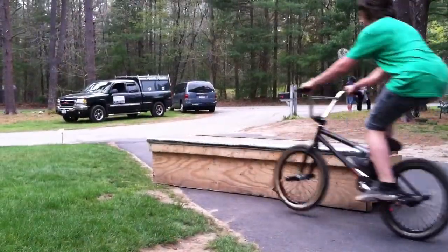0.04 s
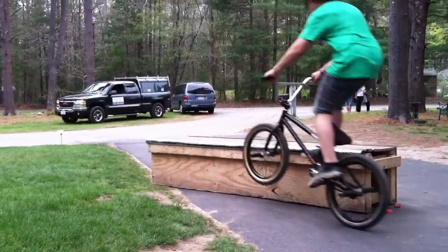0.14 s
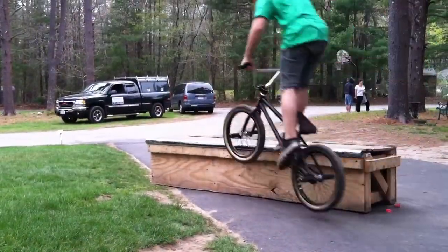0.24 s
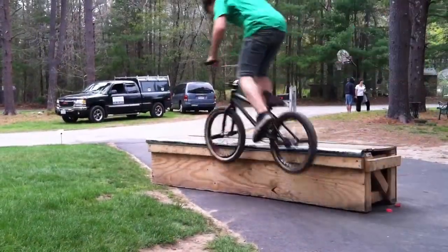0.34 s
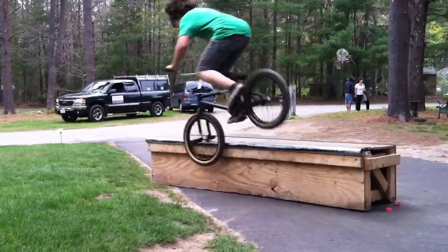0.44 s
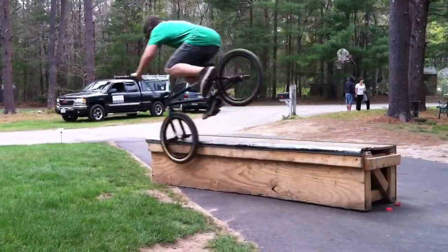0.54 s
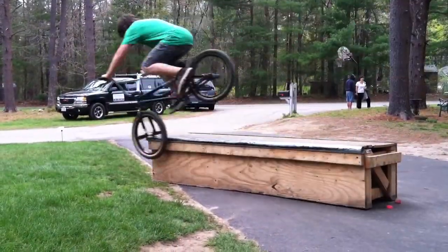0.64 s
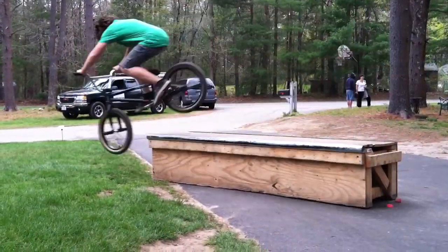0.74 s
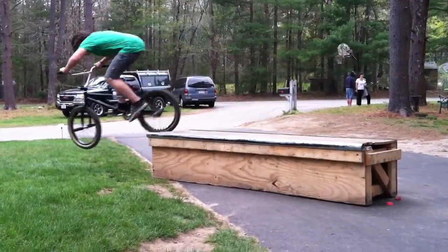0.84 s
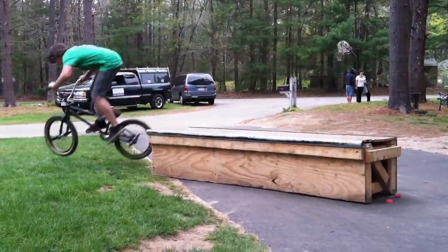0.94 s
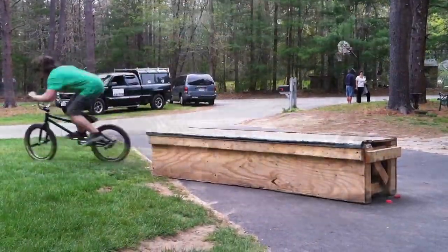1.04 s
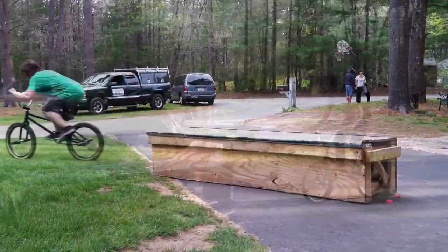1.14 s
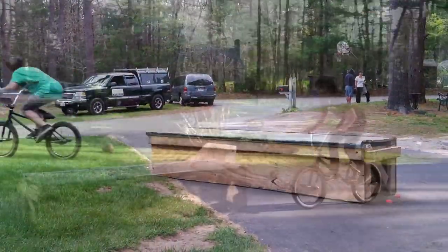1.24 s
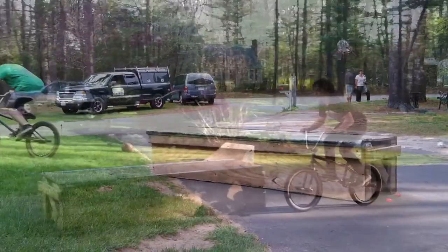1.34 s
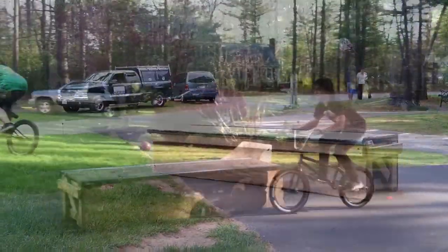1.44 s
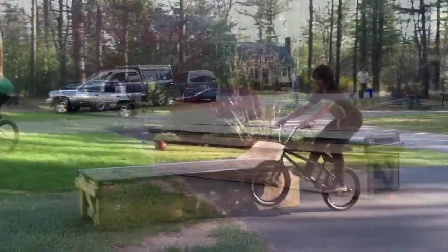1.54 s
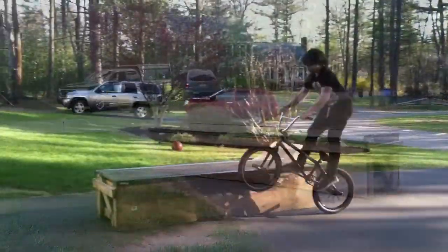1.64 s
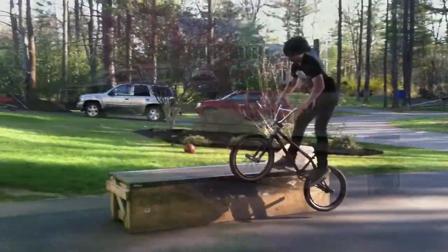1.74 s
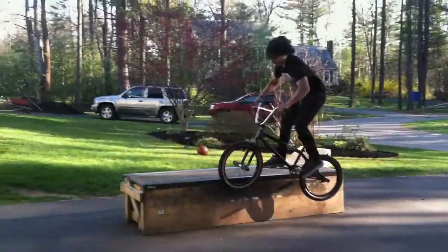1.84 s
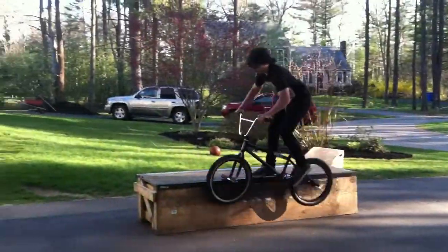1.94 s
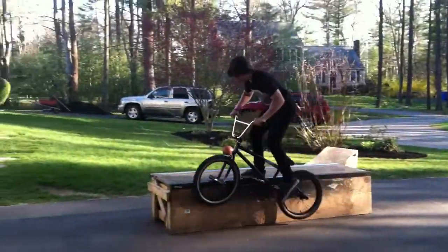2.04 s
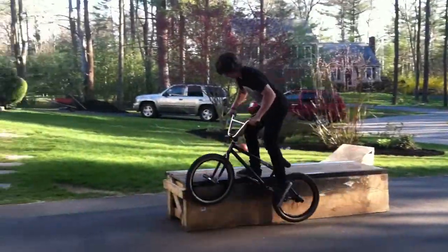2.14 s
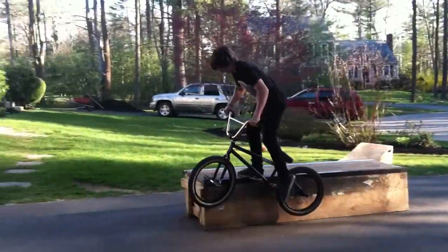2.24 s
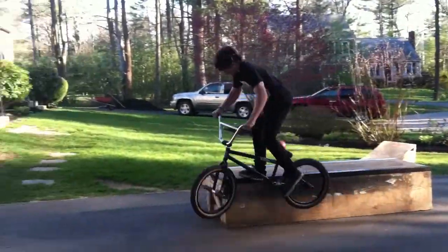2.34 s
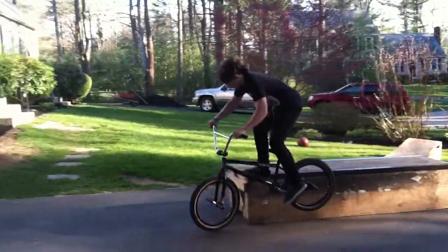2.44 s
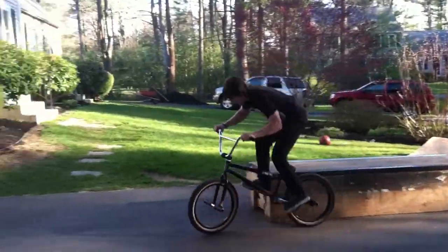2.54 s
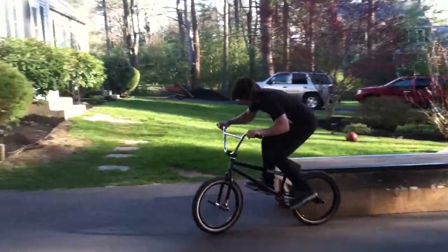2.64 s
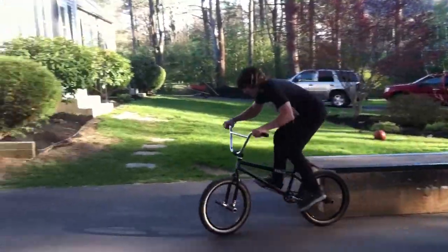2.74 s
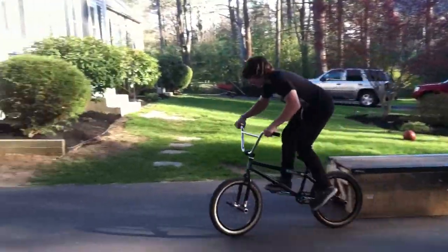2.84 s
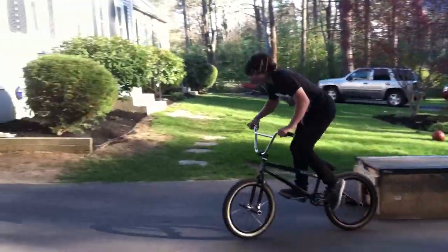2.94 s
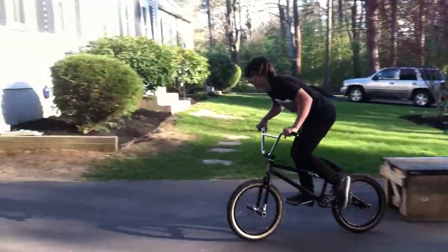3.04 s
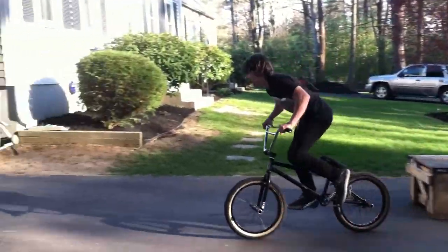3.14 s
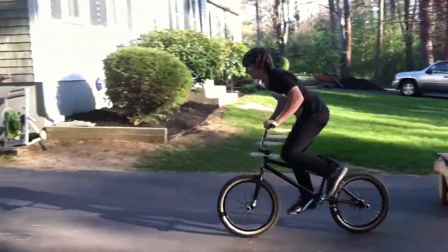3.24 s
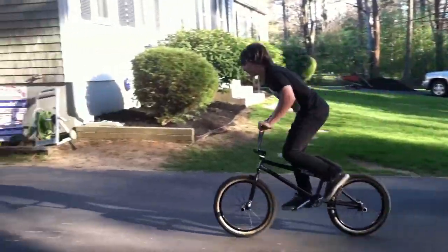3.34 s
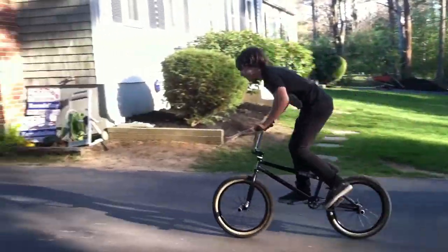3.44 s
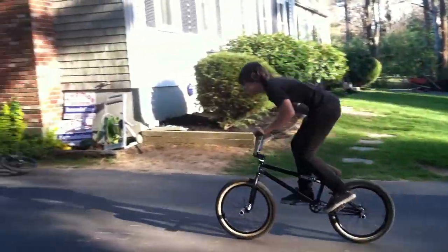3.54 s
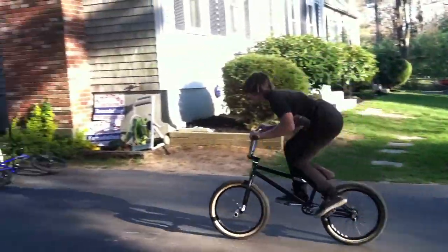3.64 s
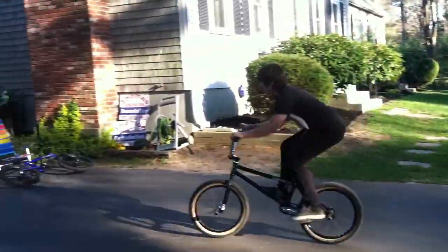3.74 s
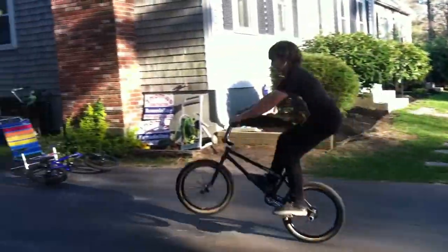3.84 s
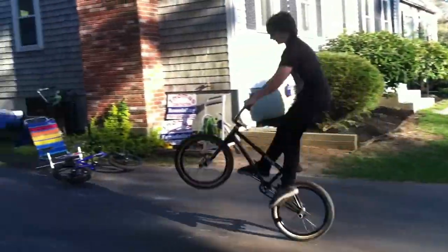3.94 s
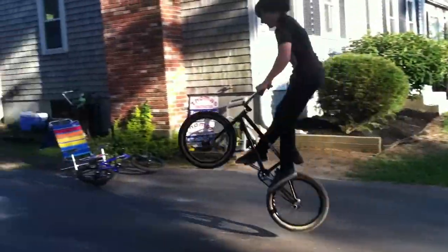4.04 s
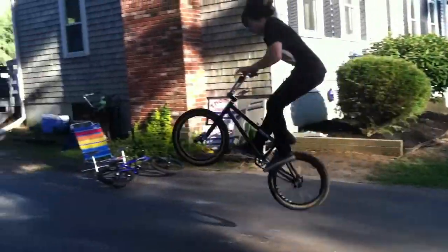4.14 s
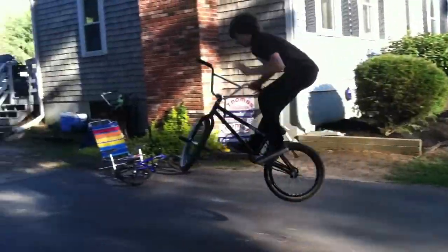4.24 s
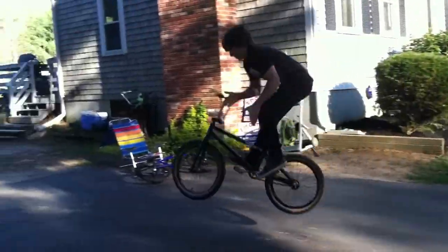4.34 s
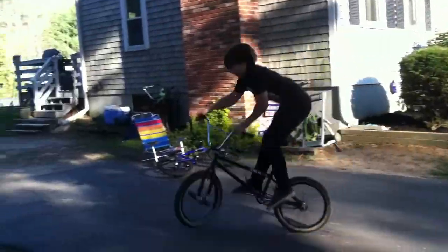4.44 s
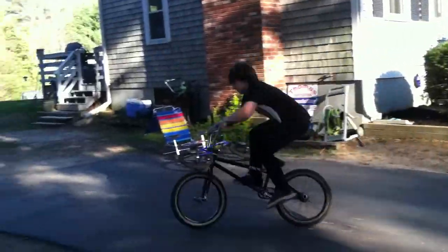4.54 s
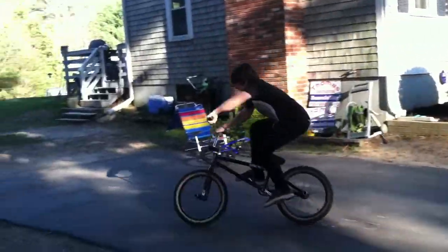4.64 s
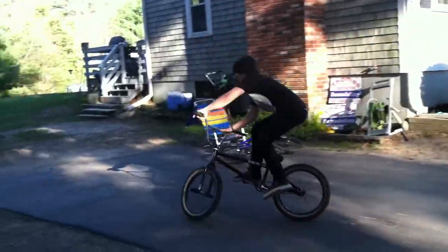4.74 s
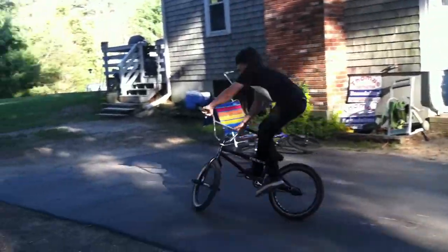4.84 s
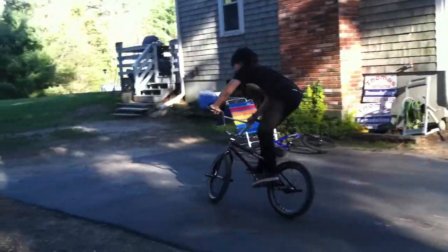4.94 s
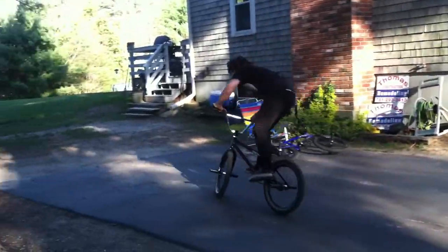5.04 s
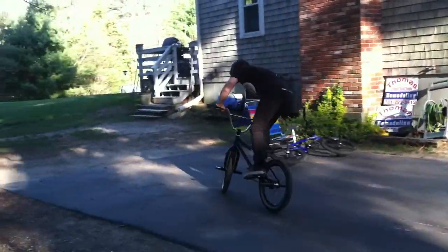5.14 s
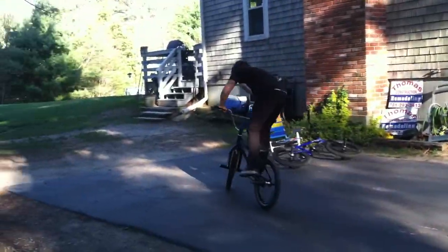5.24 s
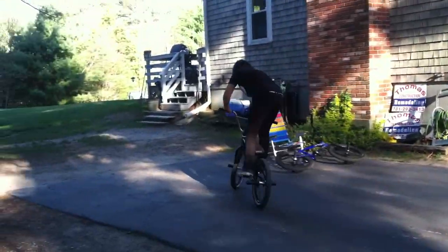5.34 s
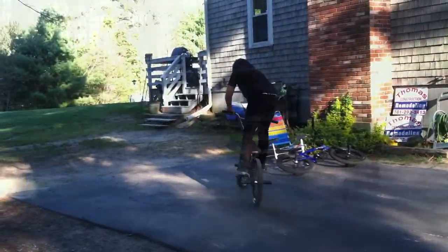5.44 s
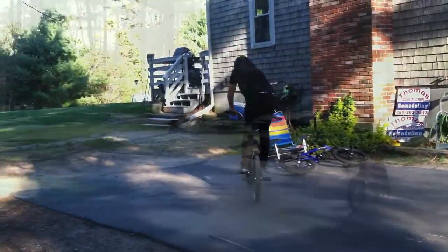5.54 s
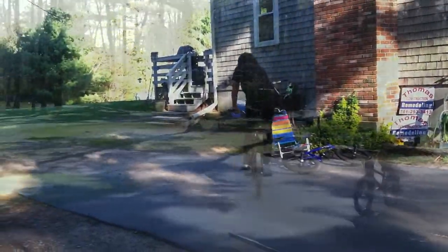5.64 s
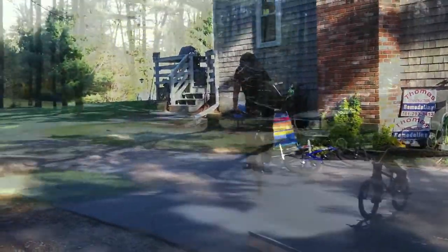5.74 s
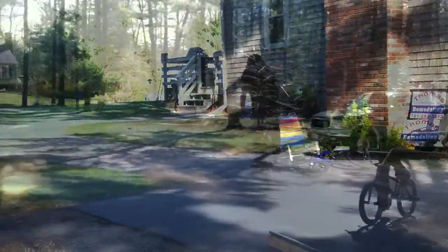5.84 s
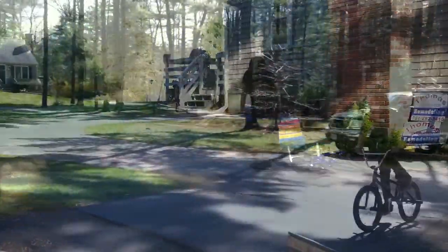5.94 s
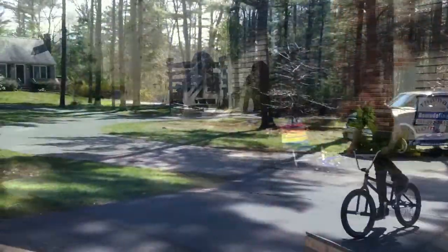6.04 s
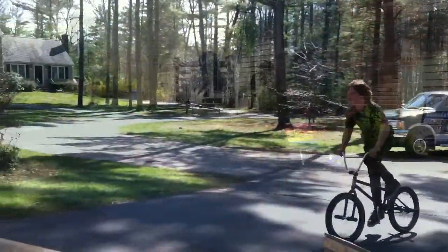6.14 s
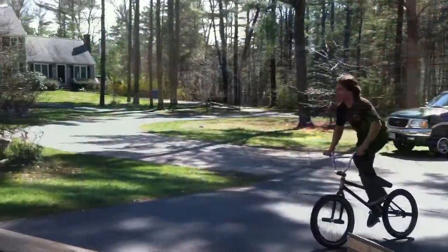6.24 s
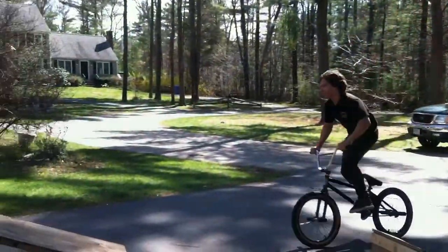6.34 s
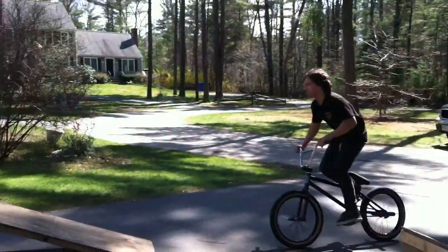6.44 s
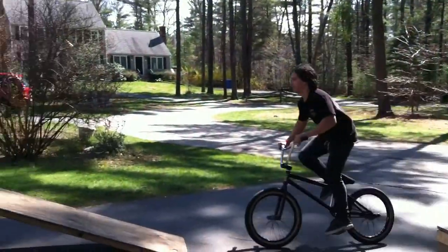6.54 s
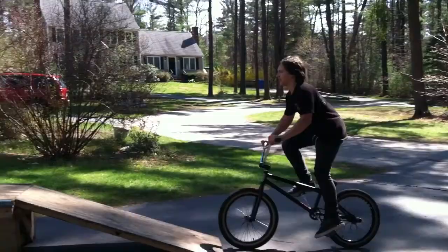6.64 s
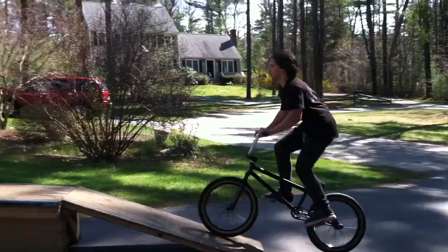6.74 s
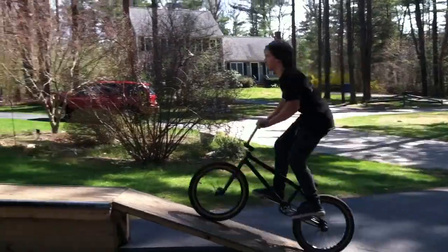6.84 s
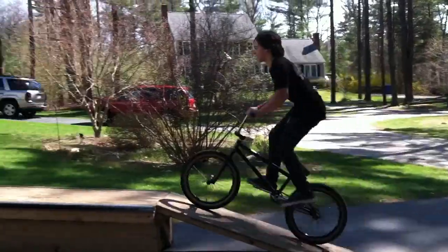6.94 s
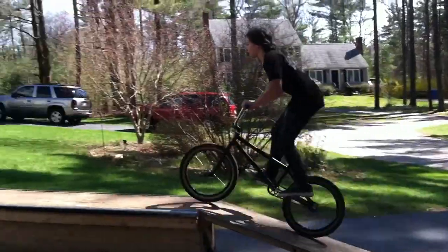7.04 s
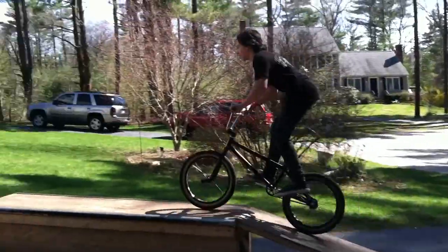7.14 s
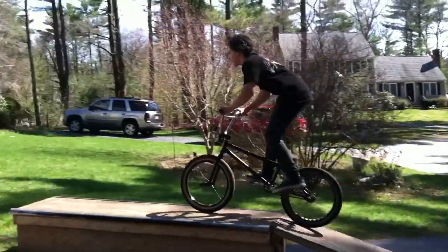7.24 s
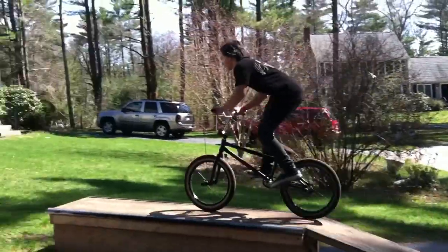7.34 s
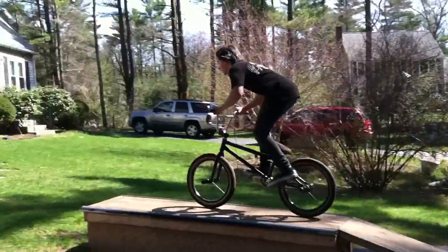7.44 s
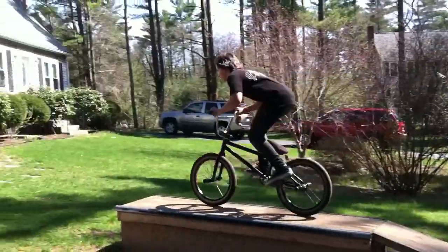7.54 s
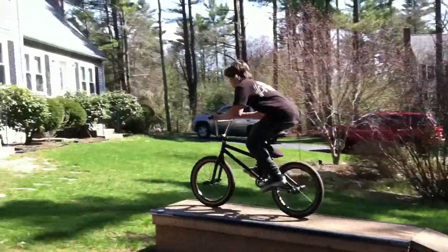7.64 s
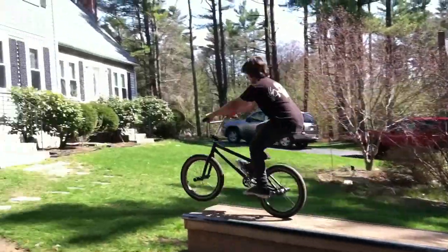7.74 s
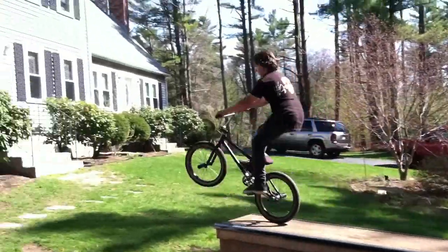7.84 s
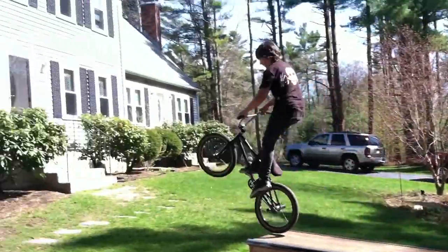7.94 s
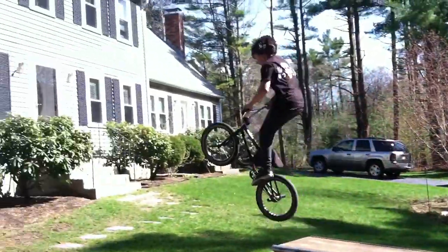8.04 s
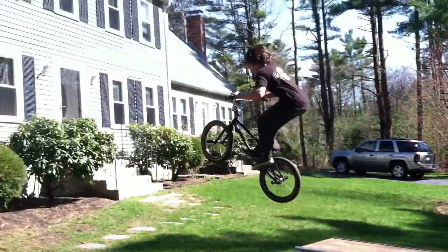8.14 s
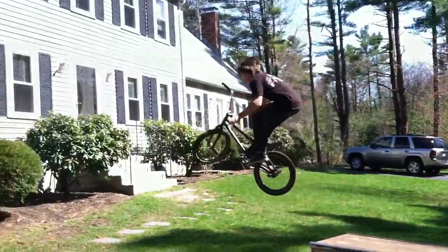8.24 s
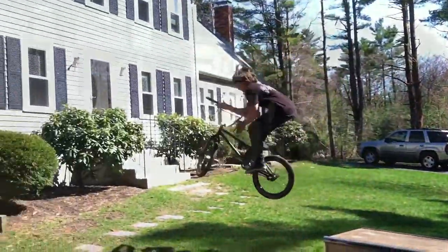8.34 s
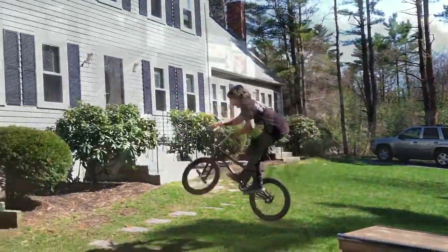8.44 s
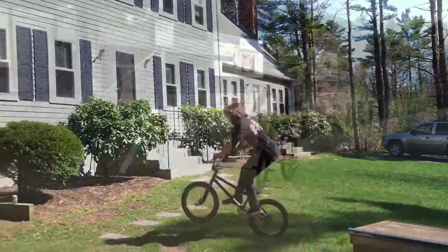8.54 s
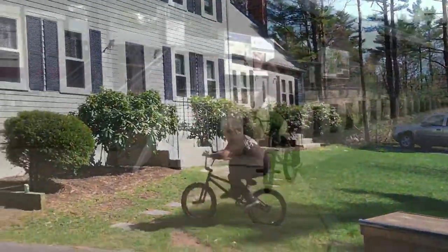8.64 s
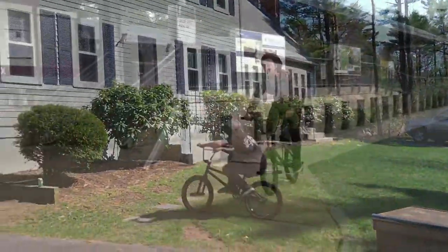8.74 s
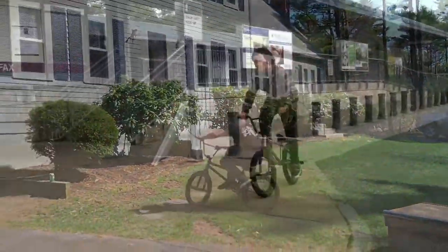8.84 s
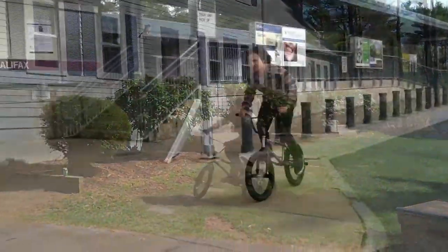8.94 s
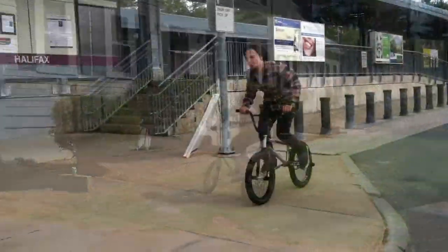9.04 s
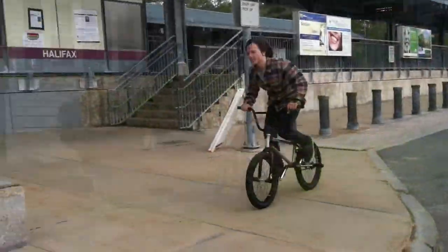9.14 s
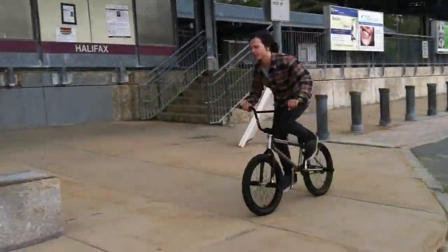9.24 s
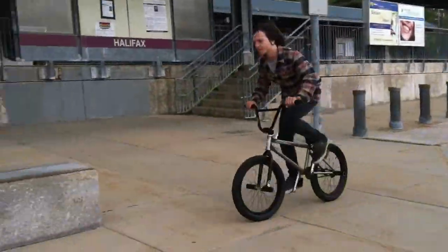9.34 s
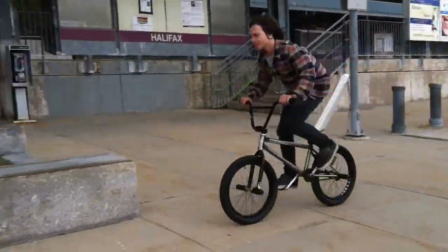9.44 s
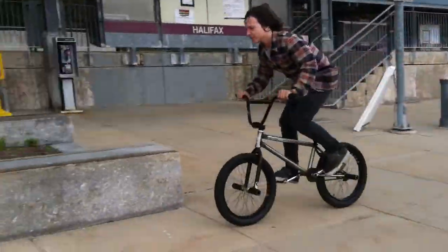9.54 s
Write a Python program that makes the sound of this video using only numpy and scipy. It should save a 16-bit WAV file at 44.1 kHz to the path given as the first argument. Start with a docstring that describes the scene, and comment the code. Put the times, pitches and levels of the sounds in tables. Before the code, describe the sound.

Close bike sounds with a faint dull yard echo: buzzing hub clicks, then two loud hollow wood impacts about a second and a half apart, each followed by short droning grinds and steel clinks. Quieter coasting follows, with distant bird whistles, a tyre slap on asphalt, two knocks onto a wooden ramp with faster ticking, a soft thud on grass, and a sudden low, crackling wind burst at the end.

```python
"""BMX runs on a driveway: the rear hub rattles in ticks whenever the rider coasts, from the start on.
Pegs slam onto a tall hollow plywood ledge, then a low one, and grind: boom, crack, scrape, drone and squeals.
A bird whistles faintly; tyres land on asphalt and scuff, then bump up a wooden ramp as a far motor swells.
They drop onto grass, and at the end wind builds up and buffets the microphone.
Noise is filtered for rattles, cracks, scrapes and wind; damped modes boom and ring; sines drone and whistle."""
import sys
import numpy as np
from scipy import signal
from scipy.fft import rfft, irfft
from scipy.io import wavfile
from scipy.ndimage import uniform_filter1d

SR = 44100
rng = np.random.default_rng(int(sys.argv[2]) if len(sys.argv) > 2 else 0)


def to_wav(sig):
    """Store sig (one row per channel, or 1-D mono) as 16-bit WAV at the path in sys.argv[1].

    Samples outside -1..1 are clipped; the rate is SR.
    """
    pcm = np.clip(np.atleast_2d(sig), -1, 1) * 32767
    pcm = np.round(pcm).astype(np.int16)
    wavfile.write(sys.argv[1], SR, pcm.T)  # frames by channels


N = 422575
TIME = np.arange(N) / SR


def undb(db):
    """Decibels to amplitude gain."""
    return 10 ** (np.asarray(db) / 20)


def sine(phase_turns):
    """Sine of a phase counted in turns."""
    return np.sin(2 * np.pi * phase_turns)


def noise():
    """White noise of unit power."""
    return rng.standard_normal(N)


def walk(rate_hz):
    """Smooth random drift with unit spread, about rate_hz new values per second."""
    hold = max(int(SR / rate_hz), 1)
    steps = np.repeat(rng.standard_normal(N // hold + 1), hold)
    drift = uniform_filter1d(steps, hold)[:N]
    return drift / drift.std()


def swell(rows):
    """Gain along (time_s, level_db) rows, silent outside them."""
    time_s, level_db = np.transpose(rows)
    inside = (TIME >= time_s[0]) & (TIME <= time_s[-1])
    return undb(np.interp(TIME, time_s, level_db)) * inside


def bell(at_s, sigma_s):
    """Gaussian rise and fall around one moment."""
    return np.exp(-.5 * ((TIME - at_s) / sigma_s) ** 2)


def fade(t, t60_s):
    """Exponential decay, 60 dB down after t60_s."""
    return np.exp(-np.log(1000) * t / t60_s)


def held(start_s, end_s, attack_s, t60_s, db_per_s):
    """Attack up to the start, a hold that slopes in dB, and a release after the end."""
    rise = np.clip(1 + (TIME - start_s) / attack_s, 0, 1)
    slope = undb(db_per_s * (np.clip(TIME, start_s, end_s) - start_s))
    return rise * slope * fade(np.maximum(TIME - end_s, 0), t60_s)


def bursts(rows):
    """Envelope of sudden bursts from (time_s, level_db, t60_s) rows; their powers add."""
    power = np.zeros(N)
    for time_s, level_db, t60_s in rows:
        part = power[int(time_s * SR):][:SR // 2]
        part += (undb(level_db) * fade(TIME[:len(part)], t60_s)) ** 2
    return np.sqrt(power)


def impulses(times_s, sizes):
    """One single-sample push at each time."""
    return np.bincount((np.asarray(times_s) * SR).astype(int), sizes, N)[:N]


def ring(x, response):
    """Pass a sound through an impulse response."""
    return signal.fftconvolve(x, response)[:N]


def unit(response):
    """Scale a response to unit energy."""
    return response / np.linalg.norm(response)


def modal(modes):
    """Half-second response of damped modes; their gains are scaled to unit total power."""
    t = TIME[:SR // 2]
    total = sum(undb(db) * fade(t, t60_s) * np.cos(2 * np.pi * hz * t) for hz, db, t60_s in modes)
    return total / np.linalg.norm(undb([db for _, db, _ in modes]))


def tint(x, points, size=4096):
    """Causal minimum-phase unit-energy filter through (freq_hz, relative_db), falling off outside."""
    hz, db = np.transpose(points)
    octave = np.log2(np.maximum(np.arange(size // 2 + 1), 1) * SR / size)
    knots = np.log2(hz)
    outside = np.abs(octave - np.clip(octave, knots[0], knots[-1]))
    curve_db = np.interp(octave, knots, db) - 18.0 * np.minimum(outside, 2)  # dB per octave, 2 octaves
    cepstrum = irfft(np.log(undb(curve_db)))
    # folding the cepstrum gives minimum phase
    cepstrum[1:size // 2] *= 2
    cepstrum[size // 2 + 1:] = 0
    return ring(x, unit(irfft(np.exp(rfft(cepstrum)))))


def soften(x, contact_hz, low_hz=85):
    """The contact cushions a push above contact_hz; the deepest bass hardly radiates."""
    cushioned = signal.sosfilt(signal.butter(4, min(contact_hz, SR / 3), fs=SR, output="sos"), x)
    return signal.sosfilt(signal.butter(2, low_hz, "highpass", fs=SR, output="sos"), cushioned)


# still air among the trees: freq_hz, relative_db
AIR_COLOUR = [(40, -42.5), (70, -14.5), (115, 1.5), (200, -0.5), (380, -9), (760, -3.5), (1600, -7),
              (2400, -13.5), (4000, -16.5), (6000, -21), (9000, -19), (12000, -29.5), (15500, -41)]
# its level: time_s, level_db
AIR_LEVEL = [(0, -50), (1.2, -57.5), (1.8, -56.5), (3.2, -58), (4.8, -54), (5.8, -58), (6.4, -56),
             (8.2, -62), (9.58, -53.5)]


def air():
    """Soft air in the trees: filtered noise with a slight flutter."""
    return tint(noise() * swell(AIR_LEVEL) * undb(0.79 * walk(18)), AIR_COLOUR)


# distant motor tones: freq_hz, relative_db
MOTOR_LINES = [(126, 3), (250, 1.5), (376, -9)]
# its swell: loudest_s, sigma_s, level_db
MOTOR_SWELL = (6.97, 0.78, -57)


def motor():
    """Hum of three sines that share one wavering clock and level."""
    clock_s = np.cumsum(1 + 0.0062 * walk(13)) / SR
    loudest_s, sigma_s, level_db = MOTOR_SWELL
    level = bell(loudest_s, sigma_s) * undb(level_db + 4.7 * walk(8))
    return level * sum(undb(db) * sine(hz * clock_s) for hz, db in MOTOR_LINES)


# distant bird whistles: start_s, length_s, start_hz, end_hz, level_db
WHISTLES = [(2.85, .32, 2750, 2270, -63), (4.2, .18, 2120, 2330, -60), (4.88, .2, 2170, 2380, -61),
            (5.56, .14, 3400, 3000, -63), (5.65, .26, 2650, 2370, -62)]


def bird():
    """Far whistles: sines that slide fast, then ease into the end pitch, wavering."""
    out, waver = np.zeros(N), 1 + 0.019 * walk(300)
    for start_s, length_s, start_hz, end_hz, level_db in WHISTLES:
        progress = np.clip((TIME - start_s) / length_s, 0, 1)
        pitch_hz = (end_hz + (start_hz - end_hz) * (1 - progress) ** 2) * waver
        envelope = np.sqrt(np.abs(np.sin(np.pi * progress)))
        out += undb(level_db) * envelope * sine(np.cumsum(pitch_hz) / SR)
    return out


# wind gusts: peak_s, peak_db (before steady_db), rise_db_per_s, fall_db_per_s
GUSTS = [(8.62, -30, 160, 55), (9.313, -9.4, 48, 61)]
# buffets, each with a pop on the microphone port: time_s, buffet_db, pop_db (before EDDY_COLOUR)
BUFFETS = [(9.068, -19, -3.5), (9.105, -12.5, -6), (9.184, -18.5, -4), (9.217, -12.5, 1), (9.25, -16, 1.5),
           (9.298, -11.5, 10.5), (9.304, -6.5, 11.5), (9.327, -8, 4), (9.354, -10.5, 5.5), (9.421, -8, -11)]
BUFFET_SIGMA_S = 0.0081
# turbulence; small eddies and pops: freq_hz, relative_db
WIND_COLOUR = [(25, -43), (60, -27), (110, -7.5), (170, -0.5), (270, -5), (400, -12), (650, -25.5),
               (1200, -63), (2500, -73)]
EDDY_COLOUR = [(200, -18), (450, 8), (900, -2.5), (1600, -17.5), (3000, -40.5), (5000, -49)]


def wind(steady_db=-3.0, flutter_db=2.0, eddy_db=-1.5, eddy_growth=1.564):
    """Turbulence thumps on the microphone; bright eddies grow faster than the force;
    each buffet adds a sharp pop of its own level."""
    gusts = [undb(db + np.minimum(rise * (TIME - peak_s), fall * (peak_s - TIME)))
             for peak_s, db, rise, fall in GUSTS]
    force = np.linalg.norm(gusts, axis=0) * undb(steady_db + flutter_db * walk(60))
    for time_s, buffet_db, _ in BUFFETS:
        force = np.hypot(force, undb(buffet_db) * bell(time_s, BUFFET_SIGMA_S))
    eddies = noise() * force ** eddy_growth * undb(eddy_db + 5.0 * (walk(300) - 2))
    times_s, _, pop_db = np.transpose(BUFFETS)
    pops = impulses(times_s, undb(pop_db))
    return tint(noise() * force, WIND_COLOUR) + tint(eddies - pops, EDDY_COLOUR)


def yard(x, echo_db=-23, t60_s=1.0, delay_s=0.046, dull_hz=3500):
    """House front and trees scatter a faint, dull echo."""
    t = TIME[:SR]
    response = rng.standard_normal(SR) * fade(t, t60_s) * (t > delay_s)
    dull = signal.sosfilt(signal.butter(1, dull_hz / (SR / 2), output="sos"), x)
    return x + undb(echo_db) * ring(dull, unit(response))


# tyre passes: nearest_s, sigma_s, level_db
ROLLS = [(.3, .7, -53.5), (3.6, 0.6, -62.5), (4.781, 0.19, -60.5), (6.66, 0.11, -47), (7.102, 0.22, -44),
         (7.796, 0.31, -48), (8.612, 0.33, -50)]
# tyres on asphalt and planks: freq_hz, relative_db
ROLL_COLOUR = [(50, -36), (110, -2), (200, -1.5), (270, -5.5), (400, -14.5), (800, -17), (2000, -29),
               (4000, -20.5)]


def tyres():
    """Tyres roll past on asphalt and planks: filtered noise, uneven in level."""
    power = sum((undb(db) * bell(nearest_s, sigma_s)) ** 2 for nearest_s, sigma_s, db in ROLLS)
    return tint(noise() * np.sqrt(power) * undb(1.7 * walk(30)), ROLL_COLOUR)


# steel bike parts clicking together: time_s, level_db, t60_s
CLINKS = [(.513, -31, .044), (1.107, -41.5, 0.096), (2.062, -25.5, 0.015), (2.0765, -20, 0.056),
          (2.6425, -29, .03), (2.672, -40, 0.075), (2.964, -50.5, .05), (3.136, -50, 0.013),
          (4.568, -23.5, 0.01), (4.589, -34, .04), (5.049, -43, .078), (5.933, -41.5, 0.014),
          (6.401, -40.5, .013), (6.605, -41, 0.0048), (6.873, -32, .012), (7.848, -33.5, .079),
          (8.674, -42.5, .022)]
# steel contact: freq_hz, relative_db
STEEL_COLOUR = [(1200, -10.5), (2200, -7), (4300, -1), (5700, -11.5), (7000, -7), (9000, 0), (10500, -9),
                (13000, -22), (15500, -45)]


def clinks():
    """Loose steel parts click: short bright noise bursts."""
    return tint(noise() * bursts(CLINKS), STEEL_COLOUR)


# frame, pegs and spokes ringing after a blow: freq_hz, relative_db, undamped_t60_s
FRAME_MODES = [(803, -4.5, 0.3), (1182, -6, .15), (1340, -4, .2), (1456, -0.5, .25), (1600, -2.5, 0.23),
               (1935, -6.5, .5), (2152, -4, 0.19), (2264, -6, 0.54), (2566, -1, 0.089), (2900, -9, .4),
               (3080, -3.5, 0.31), (3510, -3.5, .3), (4381, -9.5, .15), (6240, -4, .2), (8772, -5, .12),
               (9151, -7.5, .12)]


def frame(x, ring_db):
    """Whatever shakes the bike also sets its steel tubes ringing."""
    return x + undb(ring_db) * ring(x, unit(modal(FRAME_MODES)))


# chain and pegs slapping the frame: time_s, level_db
FRAME_SLAPS = [(.514, -31), (0.564, -44), (.65, -39), (2.063, -15), (2.15, -45), (2.19, -37), (2.39, -51),
               (2.6425, -37), (2.964, -40), (5.049, -38.5), (6.352, -41), (8.656, -50), (8.6744, -31),
               (8.712, -39)]


def clatter(damping=0.13, tick_db=-14, tick_t60_s=.03):
    """Chain and pegs slap the frame; the rider's grip cuts the ring of the tubes short."""
    out = np.zeros(N)
    for time_s, level_db in FRAME_SLAPS:
        # each slap lands somewhere else, so the modes share it differently
        chance = rng.standard_normal((len(FRAME_MODES), 2))
        modes = [(hz * (1 + 0.0072 * detune), db + 3 * share, t60_s * damping)
                 for (hz, db, t60_s), (detune, share) in zip(FRAME_MODES, chance)]
        part = out[int(time_s * SR):][:SR // 2]
        part += undb(level_db) * modal(modes)[:len(part)]
    ticks = bursts((time_s, db + tick_db, tick_t60_s) for time_s, db in FRAME_SLAPS)
    return soften(out, 9200) + tint(noise() * ticks, STEEL_COLOUR)


def rub(pressure, colour, rough_db):
    """A sliding contact catches and slips in uneven jolts."""
    jolts = undb(rough_db * (walk(260) - 2) + 1.5 * walk(40))
    return tint(noise() * jolts * pressure, colour)


# tyres scuffing after landing: time_s, pressure_db (before the jolts of rub)
SCUFF_PRESSURE = [(4.62, -60), (4.68, -50), (4.76, -52), (4.86, -54.5), (5.0, -66)]
# freq_hz, relative_db
SCUFF_COLOUR = [(250, -14), (500, 0), (750, -1), (1200, -17), (2500, -14)]


def scuff():
    """The tyres scuff as the bike swerves after landing."""
    return rub(swell(SCUFF_PRESSURE), SCUFF_COLOUR, rough_db=2.0)


# pegs sliding along a ledge: start_s, end_s, scrape_db (before the jolts of rub), scrape_slope_db_per_s,
# drone_db, drone_hz, drone_sag_hz_per_s, surface
GRINDS = [(0.536, 0.752, -39, 22, -23, 167.4, 38, "tall ledge"),
          (2.086, 2.345, -21.5, -73, -22.5, 223.8, 193, "low ledge"),
          (2.378, 2.41, -30.5, -120, -27.5, 207, 12, "low ledge"),
          (2.51, 2.678, -41, 7, -46.5, 200.2, 30, "low ledge")]
GRIND_ATTACK_S, GRIND_RELEASE_T60_S = .015, 0.29  # the peg bites, then lifts off
# ledge scrapes: freq_hz, relative_db
TALL_SCRAPE = [(400, -1), (600, 2.5), (820, -3), (1100, -9.5), (1550, -4.5), (2200, -4), (3000, -3.5),
               (3900, -2.5), (5200, -29), (6500, -14), (7700, -4), (9700, -17), (13000, -42.5)]
LOW_SCRAPE = [(240, -12), (400, 0.5), (446, -25), (594, -1.5), (925, -9), (1340, -7.5), (1790, -13.5),
              (2470, -14), (2990, -19), (3760, -24), (7000, -36), (9100, -59), (15400, -120)]


def sliding(surface):
    """How hard the pegs scrape along one ledge; the powers of its grinds add."""
    power = sum((undb(db) * held(start_s, end_s, GRIND_ATTACK_S, GRIND_RELEASE_T60_S, slope)) ** 2
                for start_s, end_s, db, slope, *_, on in GRINDS if on == surface)
    return np.sqrt(power)


def scrapes():
    """Pegs scrape along both ledges: jolting noise in each ledge's colour."""
    tall = rub(sliding("tall ledge"), TALL_SCRAPE, rough_db=3.6)
    return tall + rub(sliding("low ledge"), LOW_SCRAPE, rough_db=3.0)


DRONE_FADE_DB_PER_S, DRONE_RELEASE_T60_S = 28, 0.22


def drone(wobble=0.054, flutter_db=3):
    """Sliding keeps the plywood droning, lower as the peg moves along: wavering, falling sines."""
    out, waver, flutter = np.zeros(N), 1 + wobble * walk(110), undb(flutter_db * walk(60))
    for start_s, end_s, _, _, level_db, hz, sag_hz_per_s, _ in GRINDS:
        pitch_hz = (hz - sag_hz_per_s * (np.clip(TIME, start_s, end_s) - start_s)) * waver
        envelope = held(start_s, end_s, GRIND_ATTACK_S, DRONE_RELEASE_T60_S, -DRONE_FADE_DB_PER_S)
        out += undb(level_db) * envelope * flutter * sine(np.cumsum(pitch_hz) / SR)
    return out


# a peg binding on the edge: time_s, sigma_s, pitch_hz, level_db
SQUEALS = [(0.67, .025, 2170, -39), (0.703, 0.038, 810, -34), (0.759, 0.018, 1906, -36),
           (0.843, 0.055, 1870, -51), (2.238, 0.0072, 2930, -35), (2.29, .04, 3020, -46.5)]


def squeals(wobble=0.0123):
    """The peg binds and squeals; the grip keeps breaking, so the tone is rough."""
    chatter = walk(170)
    clock_s = np.cumsum(1 + wobble * walk(350)) / SR
    return chatter * sum(undb(db) * bell(time_s, sigma_s) * sine(hz * clock_s)
                         for time_s, sigma_s, hz, db in SQUEALS)


# coasting: start_s, end_s, ticks_per_s (before rocking), tick_db (before gain_db),
# approach_s, retreat_s, hub_colour
COASTS = [(.007, .51, 34.8, -37.5, 0, 0, "first"), (.8, 1.31, 34, -45, 0, .3, "first"),
          (1.321, 1.79, 36.48, -43, 0.41, 0.016, "driveway"), (1.84, 2.91, 34.27, -40, 0, 0.19, "driveway"),
          (3.391, 4.02, 26.73, -39, 0, 0.16, "driveway"),
          (4.077, 4.76, 25.3, -38.5, 0.17, 0.054, "driveway"), (4.897, 4.99, 35, -35.5, 0, 0.2, "driveway"),
          (5.144, 5.94, 29.9, -40.5, 0.02, 0.56, "driveway"), (5.992, 6.3, 32.27, -43.5, 0.19, 0, "far"),
          (6.899, 8.064, 44.5, -34, 0.11, 0.18, "ramp"), (8.099, 9.034, 46.3, -37, 0.021, 0.66, "ramp"),
          (9.394, 9.58, 47.95, -40.5, 0.038, 0, "last")]
# cranks rocked backwards (+) or forwards (-): time_s, sigma_s, extra_ticks_per_s
CRANK_ROCKS = [(0.082, 0.0706, 79.7), (0.455, 0.083, 10), (0.85, 0.03, 37.5), (1.001, 0.112, 15.5),
               (1.257, 0.044, 53), (1.417, 0.067, 16.9), (1.57, 0.05, 72), (2.122, 0.04, 52.5),
               (2.324, 0.036, -5.0), (2.548, 0.05, 62.1), (2.831, 0.019, 20.5), (3.523, 0.079, 55.5),
               (3.866, 0.078, 85.0), (4.154, 0.033, 12.5), (4.562, 0.13, 37.5), (4.689, 0.036, 39.5),
               (5.393, 0.0483, 10.5), (6.105, 0.078, 53.9), (7.019, 0.099, 21.5), (7.554, 0.042, 5),
               (7.826, 0.032, 71), (8.038, 0.054, -18.5), (8.389, 0.059, 44), (8.891, 0.0561, 55),
               (9.498, 0.0586, 83.5)]
# hub colours: freq_hz, relative_db
HUB_FIRST = [(1500, -5), (2200, -5.5), (3000, 2), (4200, -0.5), (5400, -43.5), (6600, -7), (8500, -2),
             (11000, -8), (13000, -17.5), (15500, -46)]
HUB_DRIVEWAY = [(1900, -12.5), (2600, -8.5), (3150, -1.5), (3900, -6.5), (4900, -4.5), (5700, -14),
                (6500, -4), (7500, -11), (8900, -1.5), (10500, -4), (12400, -6), (13400, -24.5),
                (15500, -29.5)]
HUB_FAR = [(2000, -31.5), (2800, -20), (3200, 0), (3900, 3), (5400, -13.5), (7000, -2), (8500, -20),
           (11000, -11.5), (13500, -31), (15500, -27)]
HUB_RAMP = [(2200, -18), (2750, -23.5), (3100, -9), (3600, 0.5), (4450, 0), (5400, -14), (6700, -4.5),
            (7800, -10), (9200, -16), (10800, -12), (12500, -19.5), (14000, -24), (15500, -37)]
HUB_LAST = [(1530, -11), (2600, -13.5), (2950, -27), (3310, -4), (4610, -1.5), (5780, -18.5), (7750, -7.5),
            (9310, -15), (11100, -9.5), (14000, -25), (15000, -34)]
# hub shell and spokes ringing after each tick: freq_hz, relative_db, t60_s
HUB_MODES = [(2698, -1.5, .04), (3135, -0.5, .04), (3640, -1.5, 0.032), (4404, -2.5, .05),
             (6700, -1.5, .05), (8700, -4.5, 0.044), (9800, -4, 0.054), (12100, -0.5, 0.043)]
RECEDE_DB_PER_S = 19.5  # the hub grows fainter with distance
SPIN_DB_PER_OCTAVE = 1.5  # faster teeth hit the pawls harder


def freewheel(rise_s=0.0017, tick_t60_s=0.02, tail_db=-21, tail_t60_s=0.16,
              scatter_db=1.68, gain_db=3.2, ring_db=-11):
    """Pawls drop over each ratchet tooth a moment apart: a short rattle that rings through hub and spokes."""
    t = TIME[:SR // 10]
    decay = fade(t, tick_t60_s) + undb(tail_db) * fade(t, tail_t60_s)
    tick = (1 - np.exp(-(t / rise_s) ** 2)) * decay
    colours = {"first": HUB_FIRST, "driveway": HUB_DRIVEWAY, "far": HUB_FAR,
               "ramp": HUB_RAMP, "last": HUB_LAST}
    rocking = sum(extra * bell(time_s, sigma_s) for time_s, sigma_s, extra in CRANK_ROCKS)
    tick_power = {hub: np.zeros(N) for hub in colours}
    for start_s, end_s, wheel_rate, tick_db, approach_s, retreat_s, hub in COASTS:
        inside = (TIME >= start_s) & (TIME <= end_s)
        rate = np.maximum(wheel_rate + rocking[inside], 1)
        tooth = np.diff(np.floor(np.cumsum(rate) / SR), prepend=-1) > 0
        drops_s = TIME[inside][tooth]
        away_s = np.maximum(start_s + approach_s - drops_s, 0) + np.maximum(drops_s - end_s + retreat_s, 0)
        spin_db = SPIN_DB_PER_OCTAVE * np.log2(rate[tooth] / wheel_rate)
        level_db = tick_db - RECEDE_DB_PER_S * away_s + spin_db + gain_db
        tick_power[hub] += impulses(drops_s, undb(level_db) ** 2)
    accent = undb(scatter_db * walk(60))
    rattle = np.zeros(N)
    for hub, colour in colours.items():
        envelope = np.sqrt(np.abs(ring(tick_power[hub], tick ** 2)))
        rattle += tint(noise() * accent * envelope, colour)
    return rattle + undb(ring_db) * ring(rattle, unit(modal(HUB_MODES)))


# blows: time_s, thump_db (before modes and softening), clack_db, clack_t60_s, surface
BLOWS = [(0.445, -30, -38, 0.055, "tall ledge"), (0.457, -21, -42, .04, "tall ledge"),
         (0.5116, -6.5, -3.5, 0.039, "tall ledge"), (.517, -6, -24, .04, "tall ledge"),
         (.536, -12.5, -26, .05, "tall ledge"), (.675, -19, -31, 0.068, "tall ledge"),
         (.683, -13.5, -47, .08, "tall ledge"), (.724, -26, -41, .08, "tall ledge"),
         (0.788, -20.5, -37, 0.16, "tall ledge"), (1.095, -43, -58, .05, "tall ledge"),
         (1.112, -40, -50, 0.16, "tall ledge"), (2.012, -20.5, -30.5, 0.029, "low ledge"),
         (2.0618, -7, -3.5, 0.057, "low ledge"), (2.070, -11, -26, .036, "low ledge"),
         (2.083, -10.5, -21, .069, "low ledge"), (2.112, -14, -37, .08, "low ledge"),
         (2.168, -18, -30, 0.16, "low ledge"), (2.256, -28, -43, .044, "low ledge"),
         (2.365, -42, -36.5, 0.13, "low ledge"), (2.38, -17, -35, 0.19, "low ledge"),
         (2.424, -26, -48, .043, "low ledge"), (2.625, -32, -57, .05, "low ledge"),
         (4.546, -41, -42.5, .1, "asphalt"), (4.568, -31, -24, 0.024, "asphalt"),
         (4.589, -27.5, -14, 0.018, "asphalt"), (4.603, -25, -32, 0.09, "asphalt"),
         (4.638, -25.5, -37, .08, "asphalt"), (6.81, -33, -7.5, .023, "ramp"),
         (6.819, -10, -38, 0.092, "ramp"), (6.866, -20.5, -44, .05, "ramp"),
         (6.9869, -16, -11, 0.038, "ramp"), (6.995, -18.5, -30, 0.097, "ramp"),
         (7.022, -15, -39, .07, "ramp"), (7.262, -41, -51, .063, "ramp"),
         (8.492, -34.5, -29, 0.058, "grass"), (8.583, -31, -55, .08, "grass"),
         (8.6742, -29, -32, 0.024, "grass")]


def knocks(surface, modes, colour, tail_db, tail_t60_s, contact_hz):
    """Each blow booms in the low modes, cracks as a short burst of coloured noise and leaves the bike rattling."""
    rows = [row for *row, on in BLOWS if on == surface]
    times_s, thump_db, clack_db, t60_s = np.transpose(rows)
    boom = soften(ring(impulses(times_s, undb(thump_db)), modal(modes)), contact_hz)
    crack = bursts(zip(times_s, clack_db, t60_s))
    tails = bursts((time_s, db + tail_db, tail_t60_s) for time_s, db in zip(times_s, clack_db))
    rattle = tails * undb(3.5 * walk(180))
    return boom + tint(noise() * np.hypot(crack, rattle), colour)


# low modes of each surface: freq_hz, relative_db, t60_s
TALL_LEDGE_MODES = [(88, -39, 0.067), (133.7, -13.5, .13), (169, 12, 0.14), (200.3, 11, 0.13),
                    (236, 4, 0.23), (283.8, 5.5, 0.28), (350, -18.5, .15), (521.6, -13, .16)]
LOW_LEDGE_MODES = [(75, -39.5, .1), (125, -30.5, .1), (159, -4.5, 0.32), (185.5, -2.5, 0.24),
                   (208, 4.5, 0.13), (268, -11, 0.36), (344.4, -20.5, 0.13)]
ASPHALT_MODES = [(70, -15, 0.079), (132, 1.5, .1), (216.4, 11.5, 0.13), (293, -10, 0.12), (367, -6.5, .12),
                 (523, 2, 0.25)]
RAMP_MODES = [(85, -29, .1), (150, -11, 0.29), (178, -28, .12), (215, 5.5, 0.14), (293.6, 1, 0.23),
              (345, -15, 0.24), (494, -7.5, 0.26), (635, -15, 0.26)]
GRASS_MODES = [(110, -1, .1), (158, 15, .12), (235, -10, .1), (326, 4, 0.081)]
# clack of each surface with the bike on it: freq_hz, relative_db
TALL_LEDGE_CLACK = [(300, -3), (400, -12), (560, 8.5), (700, -7.5), (820, 0.5), (1150, -3), (1450, -15),
                    (1720, -6), (2000, -18), (2570, -10.5), (3100, -10.5), (3900, -20.5), (5200, -55)]
LOW_LEDGE_CLACK = [(180, -44), (300, 4), (375, -4.5), (417, -19), (670, -1.5), (1020, -9), (1380, -2),
                   (2190, -11), (2410, -17.5), (3260, -14.5), (3670, -32.5), (4650, -24.5), (5520, -36),
                   (7000, -41.5), (9100, -65), (15400, -120)]
ASPHALT_CLACK = [(120, -31), (200, -4), (488, -10.5), (810, -6), (1040, -14.5), (1470, -10.5), (1860, -19),
                 (2230, -11.5), (2400, -20), (2580, -16.5), (7000, -31.5), (9100, -66), (15400, -120)]
RAMP_CLACK = [(150, -47.5), (250, -12), (403, -15), (660, -14), (850, -22), (1070, -13.5), (1910, -24.5),
              (2630, -37), (2850, -52), (3090, -34.5), (4420, -32), (5120, -49), (6000, -45), (7800, -48),
              (13200, -120)]
GRASS_CLACK = [(300, -8), (600, -0.5), (780, 2), (1000, -10.5), (1750, -12), (2600, -32), (5000, -30)]


def landings():
    """The blows on all five surfaces, each with its own modes, clack, rattle tail and contact softness."""
    out = knocks("tall ledge", TALL_LEDGE_MODES, TALL_LEDGE_CLACK, tail_db=-16.5, tail_t60_s=0.2, contact_hz=370)
    out += knocks("low ledge", LOW_LEDGE_MODES, LOW_LEDGE_CLACK, tail_db=-11, tail_t60_s=0.18, contact_hz=410)
    out += knocks("asphalt", ASPHALT_MODES, ASPHALT_CLACK, tail_db=-16.0, tail_t60_s=0.26, contact_hz=800)
    out += knocks("ramp", RAMP_MODES, RAMP_CLACK, tail_db=-14.5, tail_t60_s=0.25, contact_hz=795)
    out += knocks("grass", GRASS_MODES, GRASS_CLACK, tail_db=-10, tail_t60_s=0.17, contact_hz=600)
    return out


def bike():
    """Hub, blows, rubbing and loose steel shake the frame; drone, squeals and tyres bypass it."""
    shaking = freewheel() + landings() + scrapes() + scuff() + clinks() + clatter()
    return frame(shaking, ring_db=-24) + drone() + squeals() + tyres()


def scene():
    """The bike echoing in the yard, over air, motor and bird, with the wind on top."""
    surroundings = air() + motor() + bird()
    return (surroundings + wind() + yard(bike()))[None]


TOP_HZ = 15800


def record(dry):
    """The microphone thins the deep bass, rounds off the loudest peaks and cuts the top."""
    thin = signal.sosfilt(signal.butter(1, 45, "highpass", fs=SR, output="sos"), dry)
    rounded = thin / (1 + thin ** 6) ** (1 / 6)
    return signal.sosfilt(signal.ellip(10, .2, 80, TOP_HZ, fs=SR, output="sos"), rounded)


dry = scene()
out = record(dry)
to_wav(out)
```